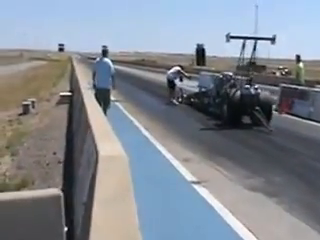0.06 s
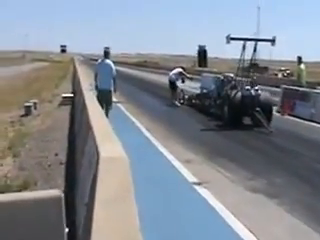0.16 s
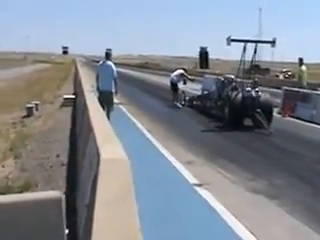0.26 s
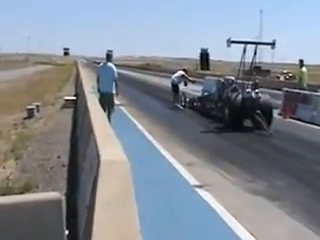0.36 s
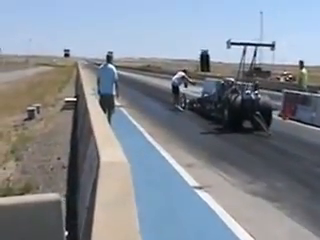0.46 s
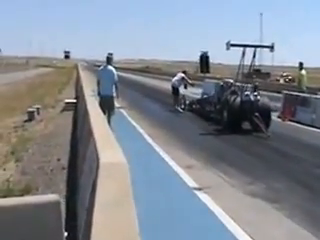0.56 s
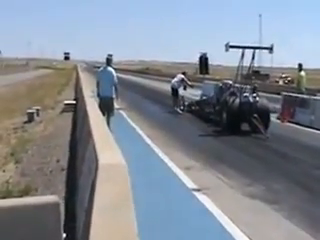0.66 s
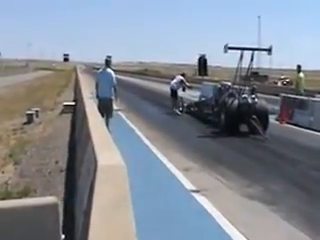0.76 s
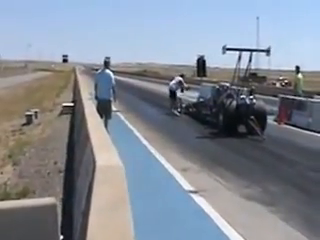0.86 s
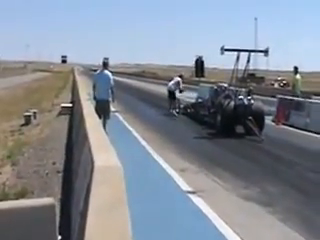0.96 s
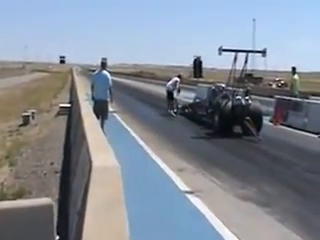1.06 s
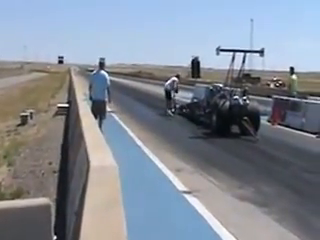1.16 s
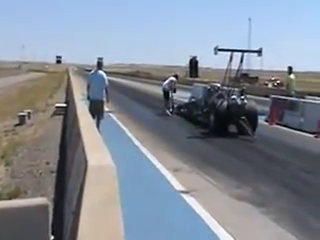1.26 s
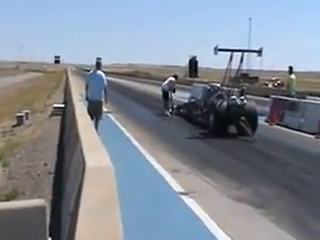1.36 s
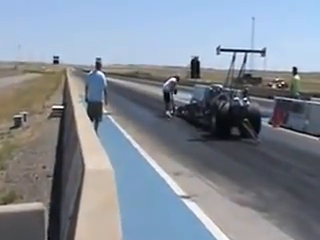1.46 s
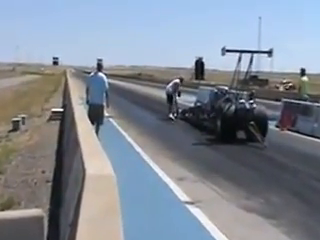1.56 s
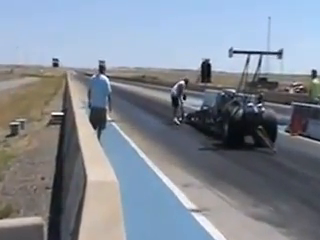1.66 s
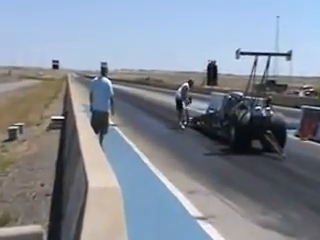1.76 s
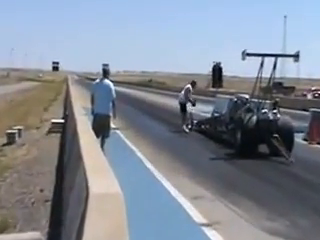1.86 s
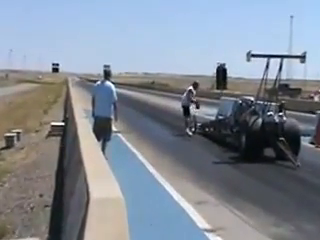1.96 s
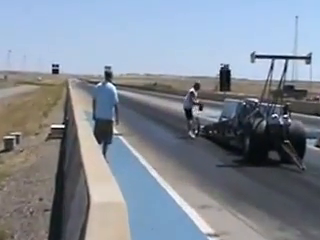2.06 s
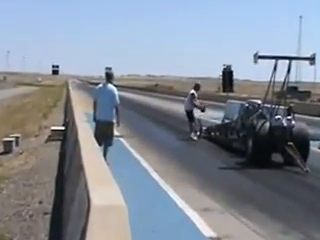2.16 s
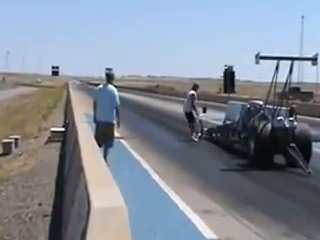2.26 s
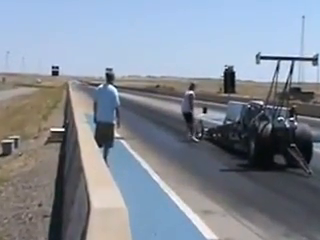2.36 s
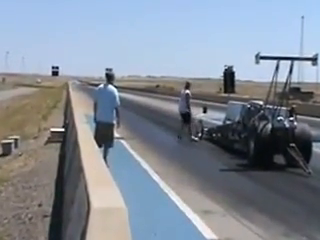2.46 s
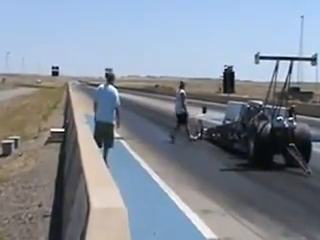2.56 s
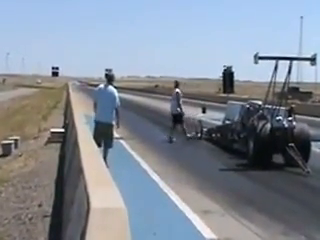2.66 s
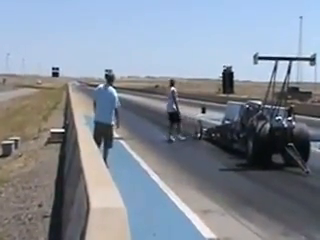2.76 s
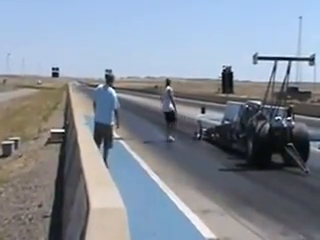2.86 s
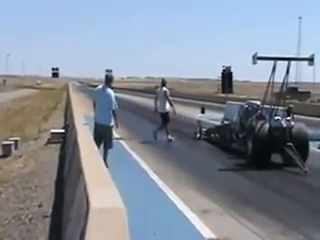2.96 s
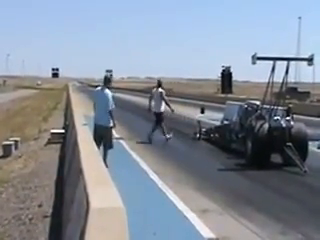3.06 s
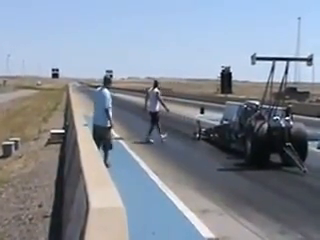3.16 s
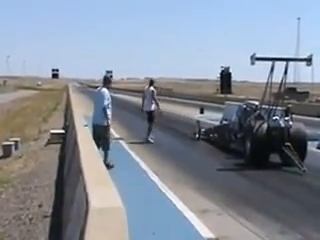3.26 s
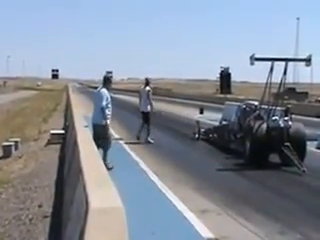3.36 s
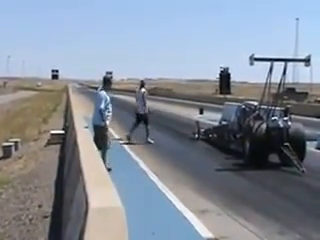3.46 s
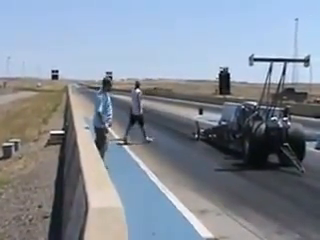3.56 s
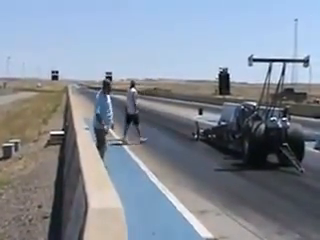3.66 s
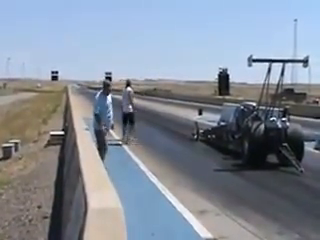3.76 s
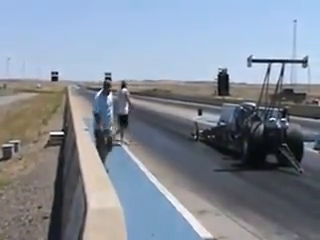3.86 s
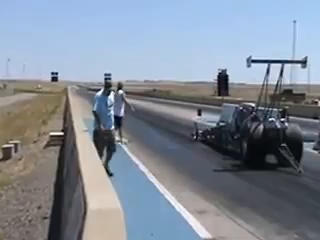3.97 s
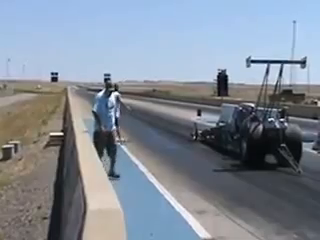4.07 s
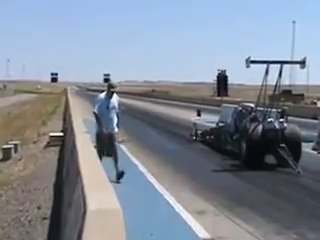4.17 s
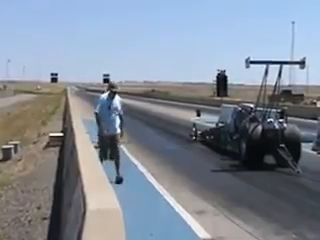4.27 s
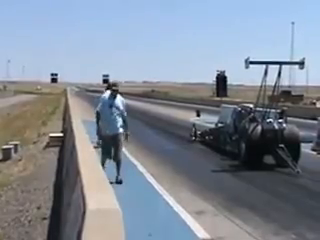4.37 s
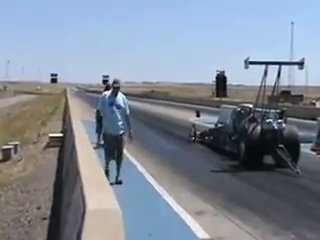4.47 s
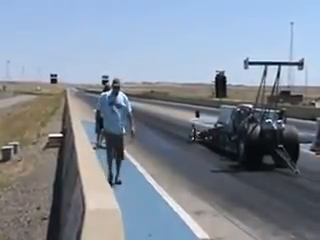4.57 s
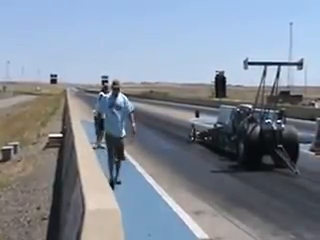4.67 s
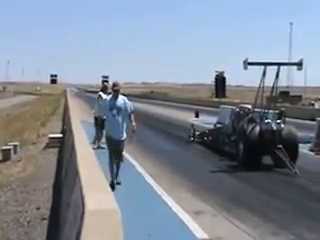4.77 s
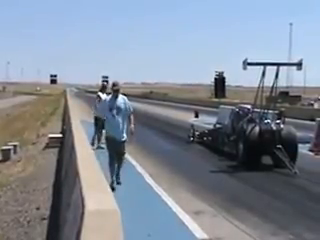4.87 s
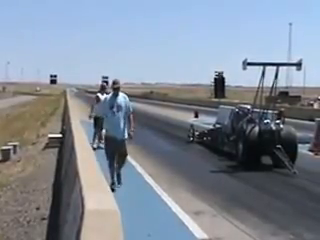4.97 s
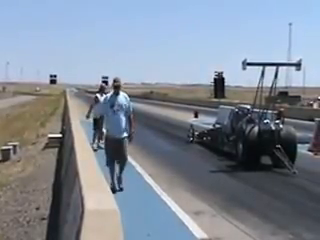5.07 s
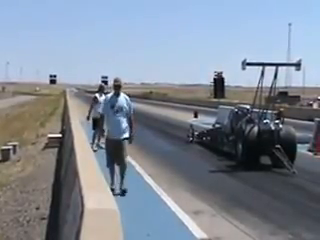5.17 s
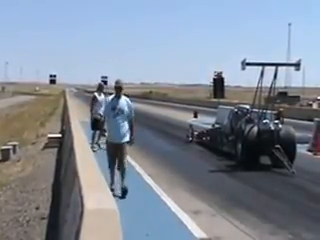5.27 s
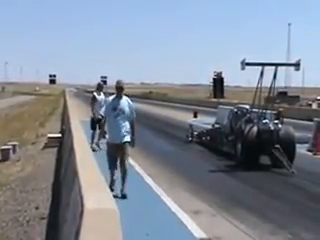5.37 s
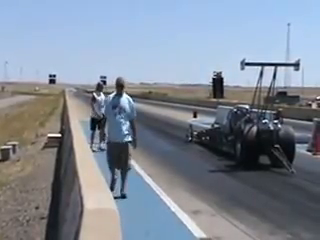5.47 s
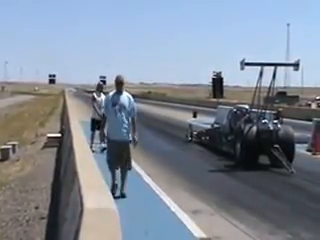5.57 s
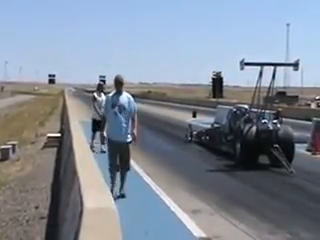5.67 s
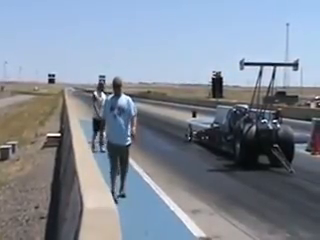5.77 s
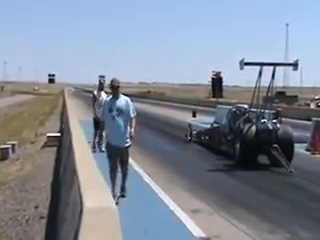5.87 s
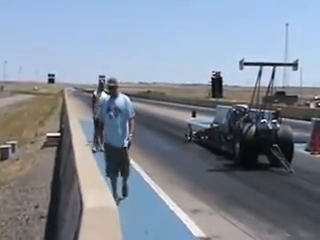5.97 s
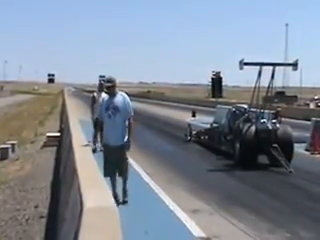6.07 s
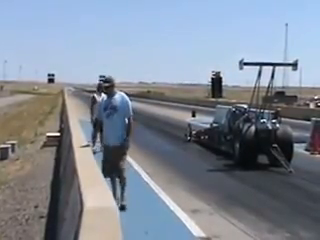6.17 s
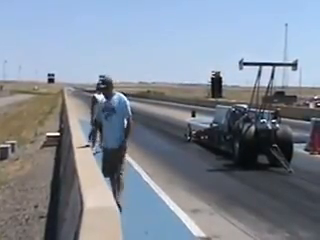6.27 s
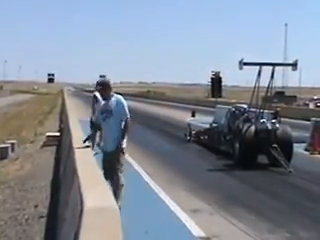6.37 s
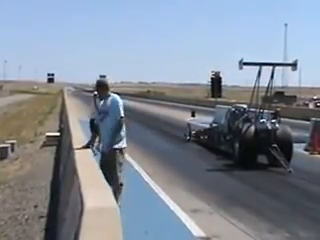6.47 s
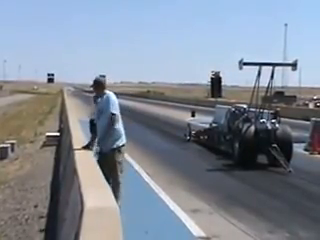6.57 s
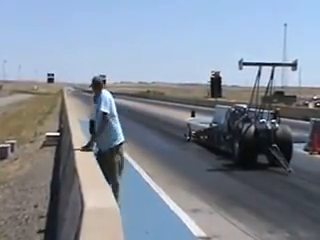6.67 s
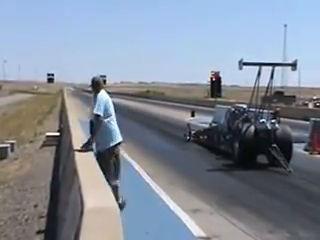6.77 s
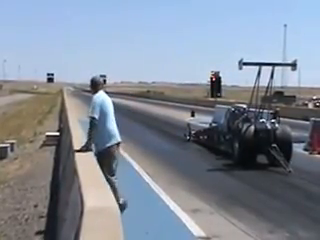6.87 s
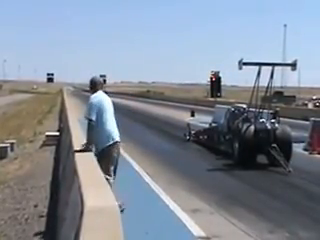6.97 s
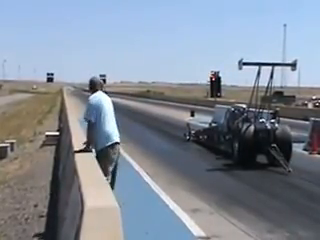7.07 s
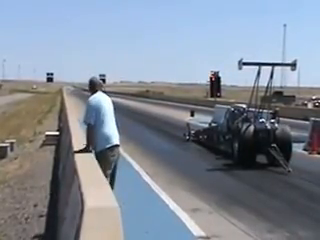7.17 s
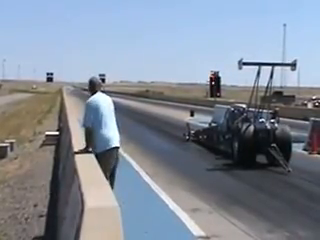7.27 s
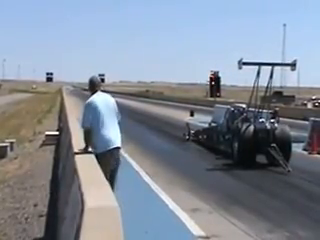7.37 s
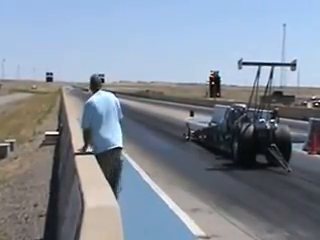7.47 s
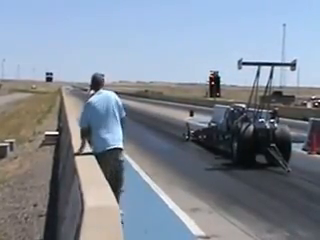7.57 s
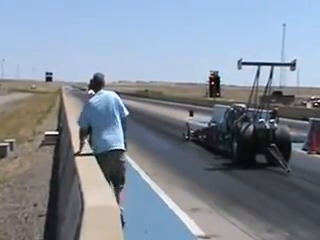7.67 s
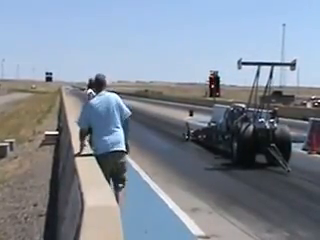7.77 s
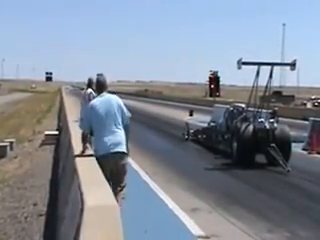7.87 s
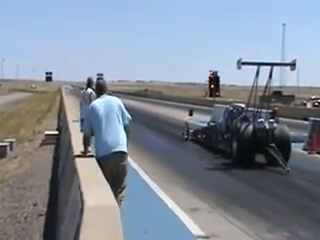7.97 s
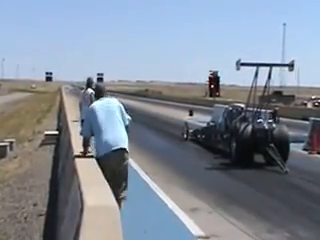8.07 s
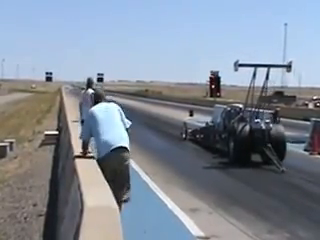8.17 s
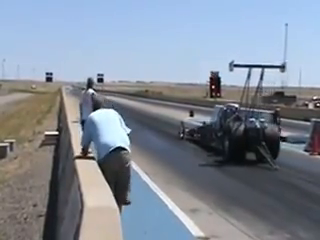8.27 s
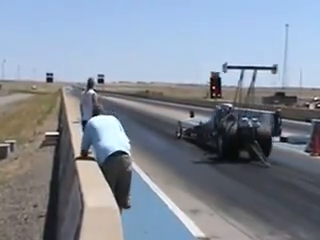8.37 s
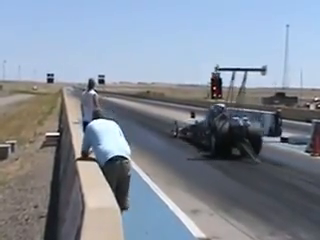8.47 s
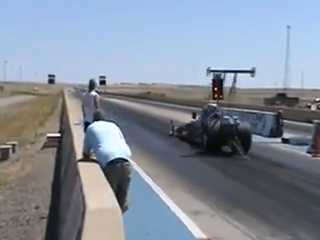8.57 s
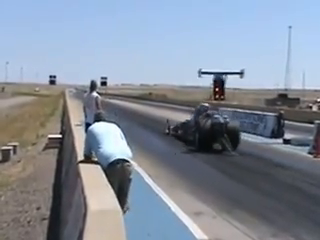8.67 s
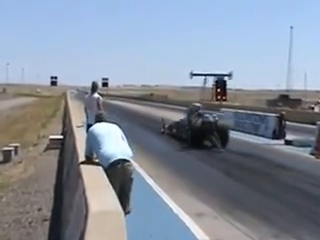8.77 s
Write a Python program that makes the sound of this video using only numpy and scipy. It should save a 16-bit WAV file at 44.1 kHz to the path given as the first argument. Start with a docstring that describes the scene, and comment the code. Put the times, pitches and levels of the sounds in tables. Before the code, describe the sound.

Heard from a few metres away at a drag strip, a big racing engine idles with an uneven, throbbing beat, peppered with sharp exhaust pops and a faint supercharger hiss. The idle wavers a little but holds for most of the time. Near the end the dragster launches at full throttle with a sudden, distorted, crackling roar that climbs in pitch.

```python
"""A supercharged V8 dragster idles on the starting line a few metres away, then launches.
At idle an uneven firing pattern makes a lumpy low note, noise bursts thump, bark and spit from the open
pipes, a faint blower hisses, and sharp cracks crowd the louder cylinders' firings, with a much louder
one about twice a second. At about 8 s the throttle snaps open: the note leaps up through the pipe
resonances and a noise jet peppered with shocks roars, overloads the microphones and fades as the car leaves."""
import sys
import numpy as np
from scipy import signal
from scipy.fft import rfft, irfft, next_fast_len
from scipy.io import wavfile
from scipy.ndimage import map_coordinates

SR = 44100
rng = np.random.default_rng(int(sys.argv[2]) if len(sys.argv) > 2 else 0)


def to_wav(sig):
    """Store sig (one row per channel, or 1-D mono) as 16-bit WAV at the path in sys.argv[1].

    Samples outside -1..1 are clipped; the rate is SR.
    """
    pcm = np.clip(np.atleast_2d(sig), -1, 1) * 32767
    pcm = np.round(pcm).astype(np.int16)
    wavfile.write(sys.argv[1], SR, pcm.T)  # frames by channels


N = 388521
TIME = np.arange(N) / SR

# The cylinders in firing order. Each row: moment in eighths of a cycle, bark in dB, spit in dB.
FIRING_ORDER = [(.63, -1, -2.5), (1.85, -7, -11), (2.64, 0, 0), (3.66, 0, .5), (4.5, -13, -7),
                (5.68, -5, -13), (6.8, -3, -6), (7.43, -6, -5)]
# Colour of the spit and of the blower hiss. Each row: frequency in Hz, relative density in dB per Hz.
SPIT_COLOUR = [(500, -25), (1100, -5.5), (1450, -0.5), (2300, 0.5), (2700, 3.5), (3150, -2.5), (4750, -1),
               (5200, -5.5), (6500, -1.5), (7000, -5.5), (7500, -5), (8800, -7), (9550, -3), (10200, -15.5)]
# Engine speed under load. Each row: time in seconds, four-stroke cycles per second.
LOADED_SPEED = [(8.2, 34.9), (8.296, 38.5), (8.428, 39.3), (8.666, 43.2), (8.73, 44.8), (8.8, 46.0)]
OPEN_AT_S, OPEN_TAKES_S = 8.005, 0.14  # the throttle snaps open


def amp(db):
    """Decibels to gain."""
    return 10 ** (np.asarray(db) / 20)


def unit(x):
    """Scaled to rms 1."""
    return x / np.sqrt(np.mean(x ** 2) + 1e-20)


def along(points, hz, axis=1):
    """One column of a table, read on a log-frequency axis."""
    cols = np.transpose(points)
    return np.interp(np.log(hz + 1), np.log(cols[0] + 1), cols[axis])


def curve(rows):
    """(seconds, value) rows as one value per sample."""
    return np.interp(TIME, *np.transpose(rows))


def wobble(rate):
    """A smooth random curve, rate knots a second."""
    knots = rng.standard_normal(1024)
    coarse = np.arange(0, N, 64)
    values = map_coordinates(knots, [coarse * rate / SR], mode="wrap")
    return np.interp(np.arange(N), coarse, values)


def filtered(x, response):
    """x times a complex response of frequency."""
    m = next_fast_len(N + SR // 4)
    spectrum = rfft(x, m) * response(np.fft.rfftfreq(m, 1 / SR))
    return irfft(spectrum, m)[..., :N]


def coloured(pair, spectrum):
    """Two unrelated signals become left and right of one spectrum, partly alike, rms 1."""
    # Each row: frequency in Hz, left-right likeness from 0 to 1.
    likeness = [(30, .6), (80, 0.84), (200, 0.82), (500, 0.96), (1000, 0.29), (2200, 0.77), (5000, 0.58),
                (10000, 0.41)]

    def response(hz):
        turn = np.arccos(np.clip(along(likeness, hz), -1, 1)) / 2
        return amp(along(spectrum, hz)) * np.array([np.cos(turn), np.sin(turn)])

    mid, side = filtered(pair, response)
    return unit(np.array([mid + side, mid - side]))


def at_ports(x, ports):
    """Lead and level difference between the two microphones, half on each side."""
    half = np.array([[.5], [-.5]])

    def response(hz):
        lead = np.exp(1j * half * along(ports, hz, axis=1))
        return lead * amp(half * along(ports, hz, axis=2))

    return filtered(x, response)


def pulses(times, sizes):
    """One impulse at each time."""
    samples = np.clip(np.round(times * SR).astype(int), 0, N)
    return np.bincount(samples, sizes, N + 1)[:N]


def puffs(times, sizes, attack, t60):
    """A burst of turbulence at each time: noise whose powers add; attack and t60 in seconds."""
    t = TIME[:SR // 8]
    shape = (1 - np.exp(-t / attack)) * amp(-60 * t / t60)
    power = signal.fftconvolve(pulses(times, sizes ** 2), shape ** 2)[:N]
    return np.sqrt(np.abs(power)) * rng.standard_normal((2, N))


def patchy(x, depth_db, width_hz, life):
    """Turbulence as random level patches in time and frequency, life seconds by width_hz, rms 1."""
    hz, t, z = signal.stft(x, SR, nperseg=128)
    knots = rng.standard_normal((64, 2048))
    grid = np.meshgrid(hz / width_hz, t / life, indexing="ij")
    field = map_coordinates(knots, grid, order=1, mode="wrap")
    _, mottled = signal.istft(z * amp(depth_db * unit(field)), SR, nperseg=128)
    return unit(mottled[:, :N])


def firings(cycles):
    """Time, bark dB and spit dB of every firing, cycle after cycle."""
    moment, bark_db, spit_db = np.transpose(FIRING_ORDER)
    count = int(cycles[-1])
    position = (np.arange(count)[:, None] + moment / len(moment)).ravel()
    when = np.interp(position, cycles, TIME)
    return when, np.tile(bark_db, count), np.tile(spit_db, count)


def exhaust_note(speed, cycles, idle_waver_db, run_waver_db, idle_drift, run_drift,
                 port_db, flow_lag, load_power, smear):
    """Low orders of the uneven firing glide through the pipes' resonances; the higher ones waver most."""
    # Fixed resonances of the pipes. Each row: frequency in Hz, gain in dB.
    resonances = [(25, -34), (70, -11), (110, -3), (180, 1), (260, -2), (330, 2), (500, -7), (660, 0),
                  (820, 2), (1100, -9), (2000, -14)]
    # Idle note at its typical speed. Each row: multiple of the cycle rate, relative level in dB.
    idle_orders = [(1, -30.5), (2, -25), (3, -28), (4, -23.5), (5, -17.5), (6, -20), (7, -13.5), (8, -1),
                   (9, -33), (10, -18), (11, -12), (12, -19), (13, 0.5), (14, -10.5), (15, -17.5), (16, -5),
                   (17, -7), (18, -18), (19, -14.5), (20, -10), (21, -12.5), (22, -18)]
    # Loaded note at its typical speed. Each row: multiple of the cycle rate, relative level in dB.
    load_orders = [(1, -19), (2, -8.5), (3, -2), (4, -15.5), (5, 0), (6, -2.5), (7, -7.5), (8, -1.5),
                   (9, -2.5), (10, -17), (11, -5.5), (12, -20), (13, -6), (14, -10), (15, -8.5), (16, -1.5),
                   (17, -3.5), (18, -4.5), (19, -7), (20, -10), (21, -14.5), (22, -21)]
    idle_hz, loaded_hz = 14.4, 40.8  # typical cycle rates
    idle_note_db, load_note_db = -16.5, -19
    moment, bark_db, _ = np.transpose(FIRING_ORDER)
    load = np.clip((speed - idle_hz) / (LOADED_SPEED[0][1] - idle_hz), 0, 1) ** load_power
    waver_db = idle_waver_db + load * (run_waver_db - idle_waver_db)
    drift = idle_drift + load * (run_drift - idle_drift)
    note = np.zeros((2, N))
    for k, ((_, idle_db), (_, load_db)) in enumerate(zip(idle_orders, load_orders), 1):
        # each open pipe sucks back just after its puff
        turns = np.exp(-2j * np.pi * k * (moment + flow_lag) / len(moment))
        pattern = -np.sum(amp(bark_db) * turns)
        # take out the resonance at the typical speed, then put it in at the actual speed
        idling = idle_note_db + idle_db - along(resonances, k * idle_hz)
        loaded = load_note_db + load_db - along(resonances, k * loaded_hz)
        db = idling + load * (loaded - idling) + along(resonances, k * speed)
        db = db + waver_db * min(k / 13, 1.3) ** 2 * wobble(16)
        # under load the ringing pipes draw each pulse out
        phase = np.angle(pattern) - smear * load * k ** 2
        line = amp(db) * np.cos(2 * np.pi * k * cycles + phase + drift * k * wobble(16))
        lean = amp(port_db * load * wobble(3.1))  # the paths to the microphones change as the car moves
        note += [line * lean, line / lean]
    return note


def stumbles(cycles, onset, recover):
    """Random misfires as a weakness curve: 0 in a steady idle, near 1 just after one; times in seconds."""
    chance_per_firing = .04
    when = firings(cycles)[0]
    missed = (rng.random(len(when)) < chance_per_firing) & (when < OPEN_AT_S)
    t = TIME[:SR // 3]
    dip = (1 - np.exp(-t / onset)) * np.exp(-t / recover)
    return np.tanh(signal.fftconvolve(pulses(when, missed * 2.), dip)[:N])


def idle_pipes(cycles, throttle, weak, jitter, scatter_db, spit_scatter_db, rev_db):
    """Firings thump, bark and spit, more on a stronger burn; opening throttle lifts bark and spit."""
    # Each row of both colours: frequency in Hz, relative density in dB per Hz.
    thump_colour = [(20, -28), (45, -14), (70, -12.5), (110, 0), (135, -2.5), (180, -2.5), (250, -9.5),
                    (330, -2), (400, -12.5), (520, -13), (900, -29.5)]
    bark_colour = [(150, -15), (300, -11.5), (420, -6.5), (520, -15.5), (610, 0), (680, -4), (770, 1.5),
                   (880, -3.5), (1000, -10), (1120, -19.5), (2000, -27.5)]
    rich_at_s, rich_for_s, rich_db = 4, 1.3, 2.5  # the spit swells a little midway through the idle
    misfire_spit_db = -4.5
    when, bark_db, spit_db = firings(cycles)
    late, burn, flame = rng.standard_normal((len(when), 3)).T
    when = when + jitter * late
    idling = when < OPEN_AT_S + OPEN_TAKES_S
    size = idling * amp(bark_db + scatter_db * burn)
    hot = idling * amp(spit_db + scatter_db * burn + spit_scatter_db * flame)

    thump = amp(-20.5) * coloured(puffs(when, size, attack=0.00079, t60=0.046), thump_colour)

    # the blow-down of a cylinder is one clean pressure pulse, followed by turbulence
    blow = np.array([unit(pulses(when, size)), np.zeros(N)])
    turbulence = unit(puffs(when, size, attack=0.00082, t60=0.034))
    bark = amp(-22.5) * coloured(turbulence + amp(-1.0) * blow, bark_colour)

    front = unit(puffs(when, hot, attack=0.00017, t60=0.011))
    tail = unit(puffs(when, hot, attack=0.0013, t60=0.034))
    spit = coloured(tail + amp(-4.0) * front, SPIT_COLOUR)
    spit = patchy(spit, depth_db=3.0, width_hz=940, life=.014)
    swell_db = rich_db * np.exp(-((TIME - rich_at_s) / rich_for_s) ** 2)
    richness_db = swell_db + .6 * wobble(6.2) + misfire_spit_db * weak
    return thump + amp(rev_db * throttle) * (bark + amp(richness_db - 30.0) * spit)


def blower():
    """The hiss of the supercharger and its belt, as steady patchy noise."""
    hiss = coloured(rng.standard_normal((2, N)), SPIT_COLOUR)
    return amp(-33.5) * patchy(hiss, depth_db=4.0, width_hz=1500, life=0.022)


def cracks(cycles, ground_delay, ground_share, scatter):
    """Fuel going off in a pipe: shock front, bounce off the track, and a tail scattered by the walls."""
    # Cracks at set moments, most of them louder than the lesser ones.
    # Each row: time in seconds, relative level in dB.
    set_cracks = [(0.102, -7.5), (1.5259, -7), (1.7437, -8.5), (1.8173, -17.5), (2.1075, -9), (3.0658, -6),
                  (3.4338, -11), (3.5818, -2.5), (4.2455, -6), (4.5467, -3.5), (4.6199, -6), (4.9127, -5.5),
                  (5.4335, -10), (6.539, -6.5), (6.7712, -7), (7.724, -8)]
    # Brighter than the spit. Each row: frequency in Hz, relative density in dB per Hz.
    crack_colour = [(600, -27), (1200, -10.5), (2000, -2.5), (2700, 2), (4300, 1), (5500, -3.5), (7200, -3),
                    (10200, -12.5)]
    # lesser cracks: chance per firing of a cylinder with 0 dB spit, relative level, spread
    chance, lesser_db, lesser_scatter_db = .6, -11.5, 1.5
    fired, _, spit_db = firings(cycles)
    set_s, set_db = np.transpose(set_cracks)
    lit = (rng.random(len(fired)) < chance * amp(spit_db) ** 2) & (fired < OPEN_AT_S)
    lesser = lit * amp(lesser_db + lesser_scatter_db * rng.standard_normal(len(fired)))
    when = np.r_[set_s, fired]
    size = np.r_[amp(set_db), lesser]
    bounce = when + ground_delay * np.exp(scatter * rng.standard_normal(len(when)))
    fronts = puffs(np.r_[when, bounce], np.r_[size, ground_share * size], attack=0.00013, t60=0.0024)
    tails = puffs(when, size, attack=0.0011, t60=0.044)
    report = coloured(unit(fronts) + amp(-5.5) * unit(tails), crack_colour)
    return amp(-33.5) * patchy(report, depth_db=3.5, width_hz=1300, life=.015)


def roar(cycles, note, shock_rate, flutter_db, gate_db):
    """Puffs merge into a jet peppered with shocks, fiercest in the troughs of the low pressure wave."""
    # Each row: frequency in Hz, relative density in dB per Hz.
    roar_colour = [(25, -8), (60, -9), (150, -10), (330, -3.5), (500, -5.5), (650, -2.5), (850, -2),
                   (1100, -6.5), (1700, -7), (2740, -9.5), (5000, -12.5), (7000, -13.5), (10000, -17.5)]
    when, bark_db, _ = firings(cycles)
    opened = TIME > OPEN_AT_S
    jet = unit(opened * puffs(when, amp(0.31 * bark_db), attack=0.00036, t60=0.013))
    chance, size = rng.random(N), rng.exponential(size=(2, N))
    shocks = unit(opened * (chance < shock_rate / SR) * (size - size.mean()))
    wave = np.tanh(unit(filtered(note[0], lambda hz: hz < 300)))
    surge = amp(flutter_db * wobble(130) - gate_db * wave)
    return amp(-21.5) * coloured((jet + amp(1.0) * shocks) * surge, roar_colour)


def overload(x):
    """The crests of the pressure wave jam the capsules, which chokes the hiss riding on them."""
    headroom_db, bias, makeup_db = 0.5, .2, 1.06  # the bias clips one way more than the other
    top = amp(headroom_db)
    jammed = top * (np.tanh(x / top + bias) - np.tanh(bias))
    return amp(makeup_db) * filtered(jammed, lambda hz: 1j * hz / (1j * hz + 20))  # 20 Hz high-pass


def scene():
    """The throttle hands the idle over to the roar, and the car leaves."""
    # Engine speed at idle, then as it flares. Each row: time in seconds, four-stroke cycles per second.
    idle_speed = [(0.0, 14.344), (0.45, 13.508), (0.6, 14.191), (2.25, 13.56), (2.55, 13.914),
                  (2.7, 13.121), (3.0, 13.663), (4.5, 13.428), (4.8, 13.647), (4.95, 13.428), (6.0, 13.595),
                  (6.3, 13.085), (6.45, 14.484), (6.6, 12.892), (6.9, 13.744), (7.95, 13.288)]
    flare_speed = [(7.99, 13.3), (8.05, 18.5), (8.13, 30.2)]
    # The microphone pair at idle, then under load.
    # Each row: frequency in Hz, lead of the left in radians, left over right in dB.
    ports_idle = [(30, -0.77, 0), (108, -0.73, 3.5), (207, -1.26, 3), (325, -1.44, 3), (590, -1.93, -0.5),
                  (970, -0.73, -2.5), (2000, -0.58, -2.5), (3200, -0.025, -0.5), (5840, -0.17, 0.5),
                  (10600, -1.1, 0)]
    ports_run = [(60, 0, 0), (190, -0.75, 6), (330, -1.5, 4), (556, -1.7, 2.5), (800, -1, 1.5),
                 (1400, -1.74, -0.5), (2700, -0.73, -1), (5700, -0.62, 0.5), (10000, -0.79, 0.5)]
    hunt_cycles, hunt_per_s = .009, 5.5  # the idle hunts: crank wander in cycles, random knots per second
    misfire_note_db = -2
    launch_db, fade_db_per_s = 4, 4  # the roar fades as the car pulls away
    blast_db, blast_for_s = 1.5, 0.16  # the first hit of the throttle gets an extra push

    speed = curve([*idle_speed, *flare_speed, *LOADED_SPEED])
    throttle = np.clip((TIME - OPEN_AT_S) / OPEN_TAKES_S, 0, 1)
    cycles = np.cumsum(speed) / SR + hunt_cycles * (1 - throttle) * wobble(hunt_per_s)
    note = exhaust_note(speed, cycles, idle_waver_db=1.53, run_waver_db=1.7, idle_drift=0.036,
                        run_drift=0.038, port_db=1.0, flow_lag=0.29, load_power=1.7, smear=0.0398)

    weak = stumbles(cycles, onset=.004, recover=.03)
    idle = note * amp(misfire_note_db * weak)
    idle = idle + idle_pipes(cycles, throttle, weak, jitter=.0003, scatter_db=1.0,
                             spit_scatter_db=0.8, rev_db=20)
    idle = idle + blower()
    idle = idle + cracks(cycles, ground_delay=0.0006, ground_share=0.63, scatter=0.2)

    run = note + roar(cycles, note, shock_rate=1700, flutter_db=1.8, gate_db=0.5)
    under_way = np.maximum(TIME - OPEN_AT_S, 0)
    leaving_db = launch_db - fade_db_per_s * under_way
    leaving_db = leaving_db + blast_db * np.exp(-(under_way / blast_for_s) ** 2)
    launched = at_ports(run * throttle * amp(leaving_db), ports_run)
    return at_ports(idle * (1 - throttle), ports_idle) + overload(launched)


def record(dry):
    """The microphones flatten the highest peaks, and a steep low-pass takes away the top treble."""
    ceiling, hardness = .84, 8
    squashed = dry / (1 + np.abs(dry / ceiling) ** hardness) ** (1 / hardness)
    silent_above_hz, slope_hz = 10550, 300
    return filtered(squashed, lambda hz: np.clip((silent_above_hz - hz) / slope_hz, 0, 1) ** 2)


dry = scene()
out = record(dry)
to_wav(out)
```